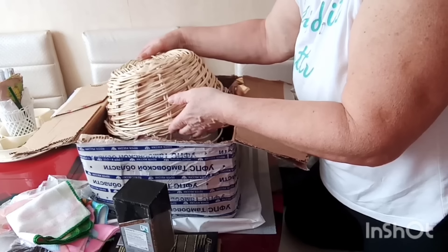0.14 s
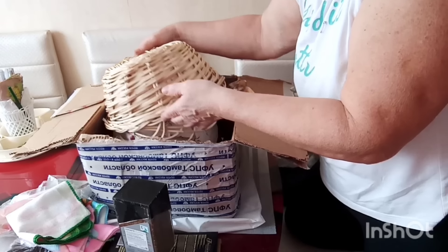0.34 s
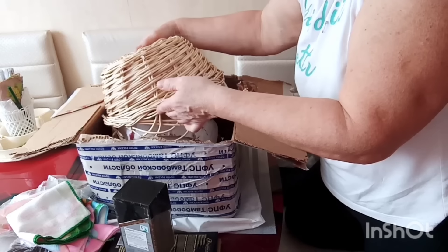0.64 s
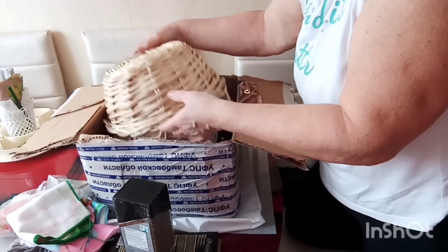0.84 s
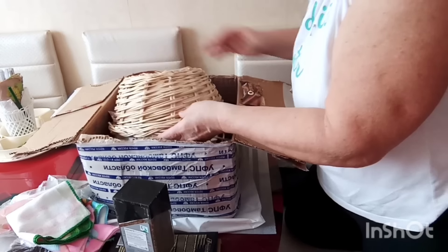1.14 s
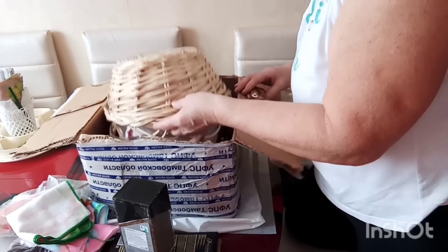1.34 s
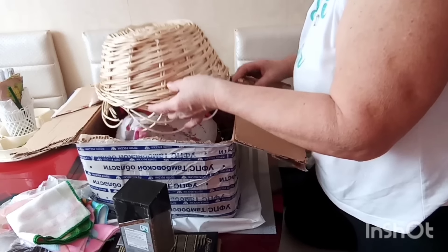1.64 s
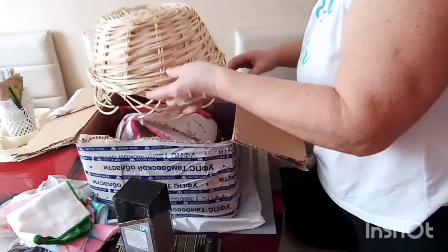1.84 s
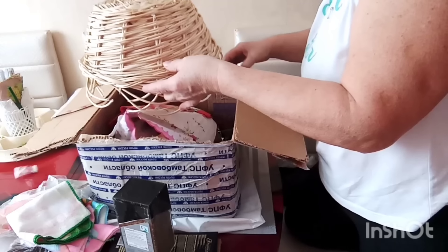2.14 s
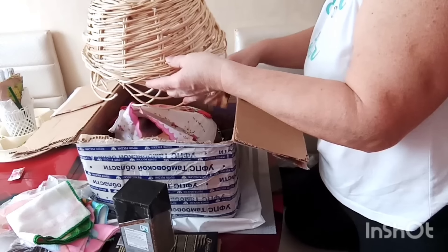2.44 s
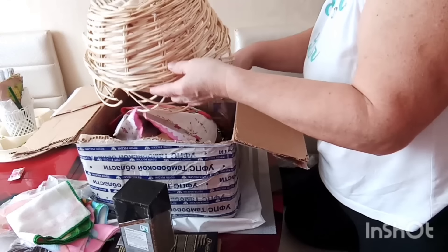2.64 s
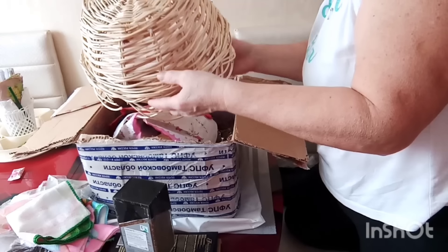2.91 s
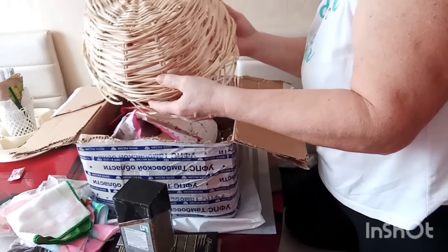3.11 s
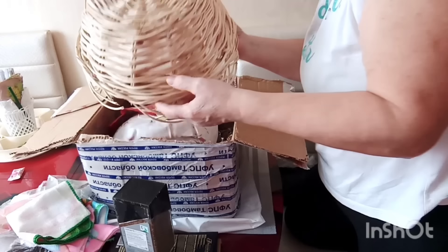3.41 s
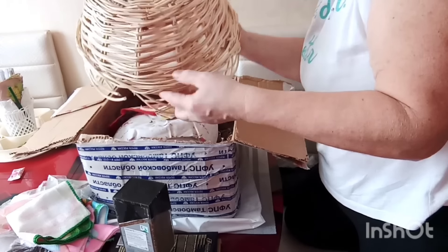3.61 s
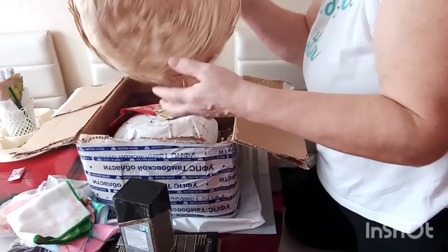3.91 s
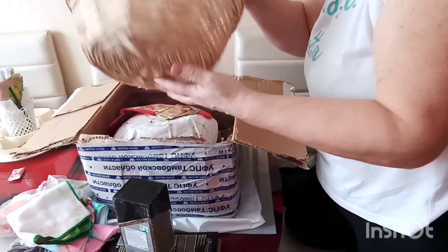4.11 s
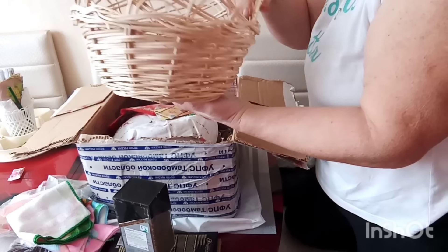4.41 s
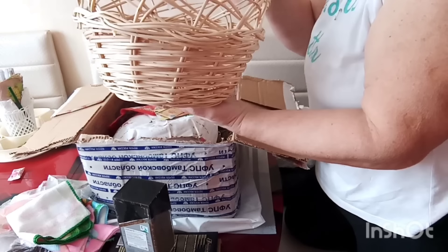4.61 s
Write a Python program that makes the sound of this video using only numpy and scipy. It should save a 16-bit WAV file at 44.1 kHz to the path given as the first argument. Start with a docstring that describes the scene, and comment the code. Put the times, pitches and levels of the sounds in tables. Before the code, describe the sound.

A wicker basket crackles, snaps and scrapes as it is worked out of a cardboard box, close by in a quiet room.

```python
"""A wicker basket is worked out of a cardboard box in a furnished room, near a phone with two microphones.
Dry strands slide and crackle, single strands snap, the rim scrapes and knocks the cardboard and the box booms.
The left microphone is nearer but turned away: it hears earlier, softer and without the top treble."""
import sys
import numpy as np
from scipy import signal
from scipy.fft import rfft, irfft, next_fast_len
from scipy.io import wavfile
from scipy.ndimage import uniform_filter1d

SR = 44100
rng = np.random.default_rng(int(sys.argv[2]) if len(sys.argv) > 2 else 0)


def unload_wav(signal):
    """Save mono or channel-first audio to the path in sys.argv[1] as 16-bit WAV at rate SR, clipped to [-1, 1]."""
    wavfile.write(
        sys.argv[1],
        SR,
        np.round(np.clip(np.atleast_2d(signal).T, -1, 1) * 32767).astype(np.int16),
    )


N = 209647

# strands that slip or snap: (s, peak dB, body dB, top dB)
SNAPS = [(.2384, -35, -8, -11.5), (.2813, -29.5, -29, -22), (.3294, -35, -12, -17), (.3994, -43, 4, -27),
         (.6432, -42, -20, -34), (.6946, -42, -20, -29), (.8969, -25, -13, -25), (.9294, -25, -12, -15),
         (1.0959, -34.5, 0, -5), (1.2331, -42, -6, -15), (1.3074, -25, -4, -17), (1.3294, -26.5, -13, -22),
         (1.4069, -32, -13.5, -30), (1.4164, -26, -6.5, -16), (1.5948, -26, -20, -12), (1.6556, -26, -16, -12),
         (1.7294, -26.5, -18, -11), (1.8694, -28, -16, 1), (2.0108, -6, 1, -13), (2.0188, -14, -25, 1),
         (2.3585, -37, -2, -24), (2.4768, -34.5, -11, -11), (2.5087, -31, -29, -26), (2.5243, -29.5, -5, -18),
         (2.5296, -26.5, -15, -27), (2.6333, -27.5, -12, -3), (2.6394, -15, -17, -5), (2.6512, -22, -10, -7.5),
         (2.6694, -19, 0, -14), (2.8709, -38, -28, -13.5), (3.1408, -50, -17.5, -7.5), (3.2173, -46, -20, -4),
         (3.223, -41, -11.5, 4), (3.266, -27.5, -20, -2), (3.5049, -45.5, -25, -11), (3.5758, -45, -30, -22.5),
         (3.6526, -46, -20.5, -9.5), (3.9374, -61.5, -15, -13), (4.0851, -48, -30.5, -14.5), (4.1662, -48.5, -20, -11),
         (4.2044, -51, -24, -10), (4.2244, -48, -27, -12.5), (4.2667, -41, -34, -15), (4.3276, -49, -20.5, -11),
         (4.4458, -34, -16, -12), (4.4947, -32.5, -5.5, -8), (4.565, -51, -10, -18), (4.6862, -45, 3.5, -37.5)]
# blows on the cardboard wall: (s, dB, strongest pitch Hz)
BLOWS = [(0.662, -39.5, 300), (.897, -36, 900), (0.938, -39, 300), (1.25, -39.5, 250), (1.597, -34.5, 350), (1.63, -46.5, 390),
         (1.73, -24.5, 502), (2.02, -49, 500), (2.49, -53, 900), (2.66, -36, 950), (2.684, -47, 297)]
WALL = [(312, -15, 0.69), (393, -9, 0.28), (461, -8.5, 0.92), (489.3, 0.5, 0.28), (634, -5, 0.52), (697, -10.5, 0.43),
        (733, -4.5, 0.24), (856, -22.5, 0.43), (920, -28.5, 0.58), (1160, -21.5, 0.17)]  # cardboard wall: (Hz, dB, ring s); a blow sounds each mode at half this dB, with a t60 of 0.13 times the ring value, capped at 0.4 s first
BOOM = [(118, -3, .1), (133, 0, .55)]  # air in the box: (Hz, dB, t60 s)  # fixed
STRANDS = [(880, -31.5), (1500, -15.5), (1810, -16), (2810, -11), (4200, -6.5), (6460, -1.5), (8670, -5), (11200, -13.5),
           (13500, -15), (14900, -1), (15600, -9.5)]  # (Hz, dB per Hz)
SCRAPE = [(94, -43), (160, -7), (243, -14), (387, -5), (539, -8), (936, -7.5), (1020, -7.5), (1070, -6.5), (1370, -10),
          (1860, -12.5), (3000, -13), (3900, -30), (6600, -120)]  # (Hz, dB per Hz)
QUIET = [(25, -14), (60, 0.5), (130, -1.5), (260, -6), (430, -8), (1000, -11.5), (2000, -15), (4300, -16.5), (6000, -16.5),
         (8600, -17), (10300, -23.5), (12500, -21.5), (15000, -14.5)]  # room tone and microphone hiss: (Hz, dB per Hz)
QUIET_DB = -76
ROOM = [(300, 0.36), (1000, 0.29), (5000, 0.41), (15000, 0.2)]  # (Hz, t60 s)
ALIKE = [(60, 1), (300, 0.83), (700, 0.59), (1500, 0.057), (6000, 0.04), (15000, 0.24)]  # (Hz, left-right likeness)
LEFT = [(60, -1), (1000, -4.5), (4200, -1.5), (7000, -5), (8800, -4), (10300, -8), (12000, -22), (13800, -32),
        (14800, -23.5), (15400, -40.5)]  # colour of the left microphone: (Hz, dB)
RIGHT = [(5200, 0), (6700, 3), (8200, -0.5)]  # the right port lifts one treble band: (Hz, dB)
LEAD = 0.0009306  # the left microphone hears this much earlier (s)
TOP_HZ = 16800  # fixed
RASP = [(.645, .08, 0.13, -40), (.7, 0.083, 0.12, -39), (.76, .1, .14, -44)]  # a hand slides over the weave with a narrow rasp: (peak s, swell s, fade s, dB)
RASP_HZ, RASP_WIDTH_HZ = 5940, 1900
BOOMS = [(.937, -41.5, .17), (2.678, -35, .24)]  # the basket thumps the box: (s, dB, s after which it dies faster)  # fixed
SQUEAKS = [(.004, .034, 1406, -45), (1.962, 1.986, 1115, -50), (2.661, 2.677, 957, -38.5)]  # short rough squeaks: (start s, end s, Hz, dB)
FADE_PACE = [1.06, 1.015, 1.31, 1.17]  # how fast strands, stakes, fibres and scrape fade, relative to the stroke
HUM_DB, HUM_T60 = -6, .5  # the drag stirs the air in the box: level over the drag, decay s
# jolts that set in at once and die away: (s, fade s for 20 dB, sliding strands dB, thick stakes dB, fine fibres dB, scrape on cardboard dB)
JOLTS = [(0.002, 0.26, -45.5, -51, -48, -47.5), (.284, 0.32, -45, -53.5, -52.5, -51.5),
         (0.402, 0.16, -45, -51.5, -51.5, -52.5), (.899, 0.2, -39, -48, -43.5, -43.5), (1.598, 0.12, -36, -63, -43, -41),
         (2.014, .16, -16, -26, -23.5, -43), (2.359, .13, -46.5, -56, -56, -57.5), (2.479, 0.23, -48, -53, -57, -62),
         (2.511, 0.17, -46, -50.5, -47, -56.5), (2.637, 0.1218, -36.5, -39, -44, -41), (2.873, 0.1, -50, -56.5, -57, -66.5),
         (3.22, 0.33, -62, -67.5, -60, -78.5), (3.268, 0.1355, -43.5, -54.5, -45, -64), (3.507, 0.08, -66, -82, -68, -87),
         (3.577, 0.09, -62, -74, -72, -84), (4.087, 0.2, -68, -80, -71, -80.5), (4.269, .2, -62.5, -77, -68, -89),
         (4.448, .1, -60, -75, -65, -78), (4.497, 0.14, -60, -63, -62, -75), (4.688, -0.07, -59.5, -66, -83.5, -83.5)]
JOLT_SWELL_S = .004  # fixed
# slides that swell and fade: (peak s, swell s for 20 dB, fade s for 20 dB, strands dB, stakes dB, fibres dB, scrape dB)
SLIDES = [(.17, 0.5, 0.65, -52, -67, -58, -72), (.245, .04, 0.33, -47.5, -53.5, -54.5, -60),
          (0.691, 0.14, 0.27, -44.5, -49.5, -50.5, -50), (.8, 0.08, .5, -53, -54.5, -56, -53), (0.886, 0.01, 0.05, -42, -52, -51, -69),
          (0.938, 0.09, 0.1438, -41, -45.5, -45, -42), (1.17, 0.5, 0.7, -54, -64, -59, -71), (1.253, 0.05, 0.39, -42, -53, -50, -49),
          (1.331, 0.1061, 0.18, -37.5, -42, -42, -48.5), (1.1, -0.3, 0.04, -52, -56, -57.5, -57), (1.427, 0.02, 0.14, -40.5, -44, -45.5, -77), (1.56, 0.1, 0.48, -49, -58, -55.5, -54.5),
          (1.656, 0.08, 0.1548, -40, -48.5, -40, -45), (1.732, .04, 0.2132, -36, -43.5, -39, -41.5), (1.93, .12, .5, -49.5, -57.5, -55, -55.5),
          (1.972, .03, .06, -58, -52, -62, -50), (2.006, .035, 0.07, -36, -39.5, -37, -52), (2.06, .05, .07, -24, -32, -31, -47), (2.115, .08, .09, -31, -34, -44, -45.5), (2.32, 1.5, 0.27, -53.5, -61, -60.5, -64.5),
          (2.501, 0.05, .16, -56, -52, -66, -50), (2.535, -0.22, 0.15, -41, -49, -44, -64), (2.673, 0.0357, 0.1165, -29, -35, -34, -37.5), (3.133, .12, 0.7, -66.5, -79, -72.5, -92.5),
          (3.359, .06, 0.08, -67, -64, -64, -64.5), (3.688, 0.2, 0.09, -58.5, -70, -62.5, -82.5), (4.18, 0.13, .1, -57, -71.5, -59, -74.5),
          (4.41, 0.18, 0.35, -61.5, -78.5, -65, -84)]
SLIP_S, SNAP_LOW_DB, SNAP_ROOM_DB = .0008, -15, 2.5  # length of the after-slips, level near 900 Hz, level of the room's answer
# the basket drags on the floor of the box, a dull rumble: (peak s, swell s for 20 dB, fade s for 20 dB, dB)
DRAGS = [(.03, .1, .16, -57), (.31, .13, .25, -63), (.42, .05, .15, -66), (.67, .06, .25, -60), (.81, .15, .13, -61),
         (.93, .06, .16, -51), (1.255, .03, .18, -56), (1.335, .08, .09, -58), (1.52, .1, .2, -64), (1.605, .015, .13, -52),
         (1.735, .015, .16, -52), (2.03, .04, .3, -54), (2.23, .25, .06, -60), (2.4, .15, .15, -70), (2.67, .05, .11, -51),
         (3.33, .13, .13, -78)]
DRAG_HZ = 400  # fixed


def amp(db):
    """Gain of a level in dB."""
    return 10 ** (np.asarray(db) / 20)


def unit(x):
    """x at rms 1."""
    return x / np.sqrt(np.mean(x ** 2) + 1e-20)


def along(points, hz):
    """(Hz, value) points on a log axis."""
    f, v = np.transpose(points)
    return np.interp(np.log(hz + 1), np.log(f + 1), v)


def filtered(x, response):
    """x times a complex response of frequency."""
    m = next_fast_len(x.shape[-1] + 4096)
    return irfft(rfft(x, m) * response(np.fft.rfftfreq(m, 1 / SR)), m)[..., :x.shape[-1]]


def ports(pair):
    """Two unrelated signals become a left and a right one that share a part, most of it in the bass."""
    alike = lambda hz: np.clip(along(ALIKE, hz), 0, 1)
    shared = filtered(pair[0], alike)
    return np.array([pair[0], shared + filtered(pair[1], lambda hz: np.sqrt(1 - alike(hz) ** 2))])


def crackle(spectrum, rate, spread_db, share, patchy_db):
    """Tiny slips of uneven size over a patchy hiss, in the colour of the spectrum."""
    luck = rng.random((2, N))
    slips = (luck[0] < rate / SR) * amp(-spread_db * np.log(luck[1] + .01))  # fixed
    slips = unit(slips) * rng.standard_normal((2, N))
    z = signal.stft(rng.standard_normal((2, N)), nperseg=256)[2]
    field = uniform_filter1d(uniform_filter1d(rng.standard_normal(z.shape[1:]), size=6, axis=0), size=8, axis=1)
    hiss = unit(signal.istft(z * amp(patchy_db * unit(field)), nperseg=256)[1][:, :N])
    knots = rng.standard_normal(N // 400 + 2)  # fixed; the sliding sticks and lets go about a hundred times a second
    hiss *= amp(patchy_db * 0.53 * np.interp(np.arange(N) / 400, np.arange(len(knots)), knots))
    share = np.clip(share, 0, 1)
    mix = np.sqrt(share) * slips + np.sqrt(1 - share) * hiss
    return unit(filtered(ports(mix), lambda hz: amp(along(spectrum, hz))))


def echo():
    """A fresh stereo room tail of energy 1; each frequency dies at its own speed."""
    hz, t, z = signal.stft(ports(rng.standard_normal((2, SR // 2))), SR, nperseg=256)
    tail = signal.istft(z * amp(-60 * t / along(ROOM, hz)[:, None]), SR, nperseg=256)[1][:, :SR // 2]
    return tail / np.linalg.norm(tail[0])


def ring(modes, scatter_db, rise=.003):
    """Half a second of fading modes at new strengths."""
    t = np.arange(SR // 2) / SR
    return (1 - np.exp(-t / rise)) * sum(
        amp(db + scatter_db * rng.normal() - 60 * t / t60) * np.sin(2 * np.pi * hz * t) for hz, db, t60 in modes)


def add(out, s, sound):
    """Mixes a sound in at time s."""
    part = out[:, round(s * SR):round(s * SR) + sound.shape[-1]]
    part += sound[..., :part.shape[1]]


def handling():
    """Strands, stakes and fibres of the weave slide over each other; the rim scrapes the cardboard."""
    slide, thick, fine, scrape = effort()
    weave = crackle(STRANDS, rate=1200, spread_db=3.5, share=.2, patchy_db=1.2)  # fixed
    stakes = filtered(weave, lambda hz: 1 / (1 + (hz / 4000) ** 12))  # fixed
    fibres = filtered(weave, lambda hz: 1 - 1 / (1 + (hz / 9500) ** 16))  # fixed
    rim = crackle(SCRAPE, rate=480, spread_db=5, share=0.089, patchy_db=0.5)
    drag = filtered(rim, lambda hz: 1 / (1 + (hz / DRAG_HZ) ** 8))  # fixed
    rasp = summed(RASP) * narrow(RASP_HZ, RASP_WIDTH_HZ)
    return (slide * unit(weave - stakes - fibres) + thick * unit(stakes)
            + amp(4.0) * fine * unit(fibres) + scrape * unit(rim - drag) + summed(DRAGS) * unit(drag) + rasp)


def snaps():
    """A sharp click, a short run of after-slips, then the room's answer."""
    out, t = np.zeros((2, N)), np.arange(4096) / SR
    for s, db, body_db, top_db in SNAPS:
        slip = rng.standard_normal(len(t)) * np.exp(-t / SLIP_S) * 0.37
        slip[0] += 1
        tilt = [(150, -45), (900, SNAP_LOW_DB), (3000, body_db + 7.0), (6000, 0), (13000, top_db + 12.5)]
        colour = lambda hz: amp(np.maximum(along(STRANDS, np.clip(hz, 2500, 15200)), -40) + along(tilt, hz))
        slip = np.roll(filtered(np.roll(slip, 200), colour), -180)  # fixed
        slip *= amp(db + 4.5) / np.abs(slip).max()
        add(out, s, amp(4.5) * slip)  # fixed; the direct crack stands out from its echo
        add(out, s + .003, amp(SNAP_ROOM_DB) * signal.fftconvolve(slip[None], echo(), axes=1))
    return out


def box():
    """Blows rattle the wall, which the room smears; the air in the box hums and booms."""
    out = hum()
    for s, db, centre_hz in BLOWS:
        # the place of the blow favours the modes near one pitch
        modes = [(hz, level / 2 - 12 * np.log2(hz / centre_hz) ** 2, 0.13 * min(t60, .4)) for hz, level, t60 in WALL]
        knock = amp(db) * ring(modes, scatter_db=2, rise=.0015)  # fixed
        add(out, s, amp(3) * knock)  # fixed
        add(out, s + 0.0044, amp(7.5) * signal.fftconvolve(knock[None], echo(), axes=1))
    for s, db, end in BOOMS:
        damping = np.exp(-(np.arange(SR // 2) / SR / end) ** 4)  # fixed
        add(out, s, amp(db) * damping * ring(BOOM, scatter_db=.5, rise=.01))  # fixed
    for start, end, hz, db in SQUEAKS:
        t = np.arange(round((end - start) * SR)) / SR
        waver = np.cumsum(rng.standard_normal(len(t))) * .055  # fixed; the phase wanders, so the tone is rough
        squeak = amp(db) * np.sin(np.pi * t / t[-1]) ** .5 * np.sin(2 * np.pi * hz * t + waver)
        add(out, start, squeak)
        add(out, start, amp(-3) * signal.fftconvolve(squeak[None], echo(), axes=1))
    return out


def resonance(centre_hz, width_hz):
    """Response of one resonance."""
    return lambda f: 1j * f * width_hz / (centre_hz ** 2 - f * f + 1j * f * width_hz)


def narrow(centre_hz, width_hz):
    """Noise pressed twice through one resonance."""
    peak = resonance(centre_hz, width_hz)
    return unit(filtered(ports(rng.standard_normal((2, N))), lambda f: peak(f) ** 2))


def stroke(peak, swell, fade):
    """Level in dB of one stroke: a steady climb to the peak, then a steady fall."""
    t = np.arange(N) / SR - peak
    return -20 * np.where(t < 0, -t / swell, t / fade)


def effort():
    """Gains of strands, stakes, fibres and scrape: the power of all jolts and slides adds up."""
    power = np.zeros((4, N))
    for peak, swell, fade, *levels_db in SLIDES + [(s, JOLT_SWELL_S, *rest) for s, *rest in JOLTS]:
        near = slice(max(round((peak - 4 * swell) * SR), 0), round((peak + 4 * fade) * SR))  # fixed
        power[:, near] += amp(2 * (np.outer(FADE_PACE, stroke(peak, swell, fade)[near]) + np.array(levels_db)[:, None]))
    return np.sqrt(power)


def hum():
    """The air in the box takes up the power of the drag and lets it go slowly."""
    keep = amp(-2 * 60 / HUM_T60 / SR)  # fixed
    stored = signal.lfilter([1 - keep], [1, -keep], summed(DRAGS) ** 2)
    return amp(HUM_DB) * np.sqrt(np.abs(stored)) * narrow(BOOM[-1][0], width_hz=22)  # fixed


def summed(rows):
    """Gain of strokes whose power adds up."""
    return np.sqrt(sum(amp(2 * (stroke(*shape) + db)) for *shape, db in rows))


def scene():
    """The basket and the box."""
    return handling() + snaps() + box()


def record(dry):
    """The left microphone is early and dull; both add their own quiet noise; bass and top treble are cut."""
    left = filtered(dry[0], lambda hz: amp(along(LEFT, hz)) * np.exp(1j * np.pi * hz * LEAD))
    right = filtered(dry[1], lambda hz: amp(along(RIGHT, hz)) * np.exp(-1j * np.pi * hz * LEAD))
    quiet = unit(filtered(rng.standard_normal((2, N)), lambda hz: amp(along(QUIET, hz))))
    heard = filtered(np.array([left, right]), lambda hz: amp(along([(40, -16.5), (100, 1)], hz)))
    heard = heard + amp([[QUIET_DB - 0.5], [QUIET_DB + 3]]) * quiet
    heard = heard / (1 + np.abs(heard / .95) ** 6) ** (1 / 6)  # fixed; the loudest peaks are rounded off
    fade = lambda hz: amp(along([(15500, 1), (15800, -27), (16600, -34.5)], hz))
    return filtered(heard, lambda hz: fade(hz) * (hz < TOP_HZ))


dry = scene()
out = record(dry)
unload_wav(out)
```